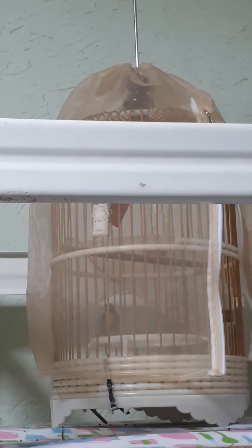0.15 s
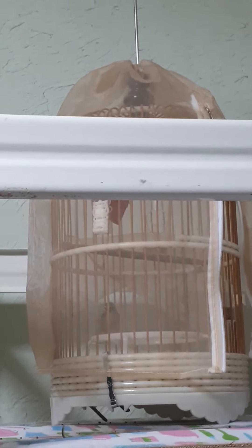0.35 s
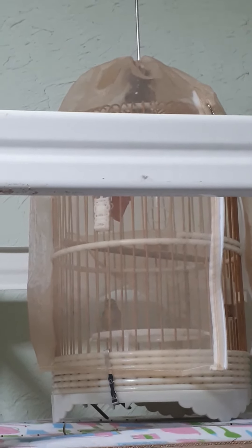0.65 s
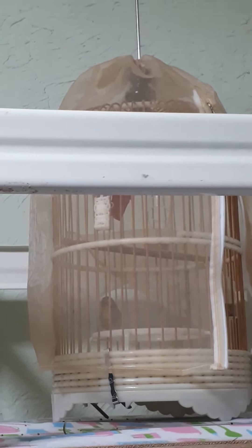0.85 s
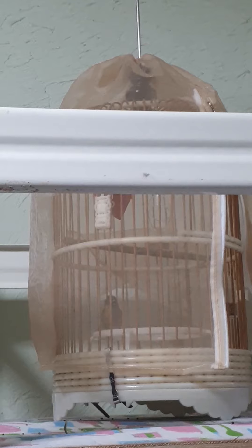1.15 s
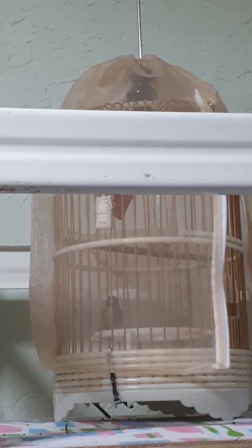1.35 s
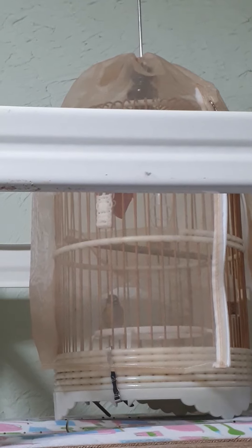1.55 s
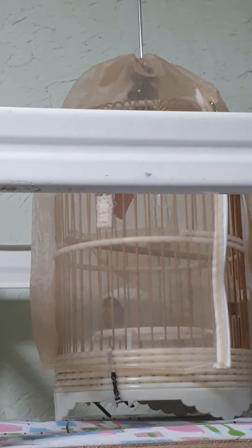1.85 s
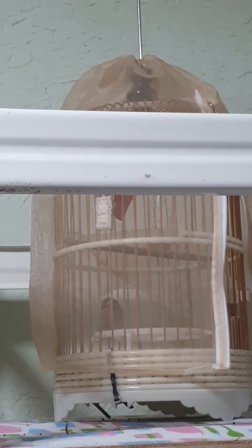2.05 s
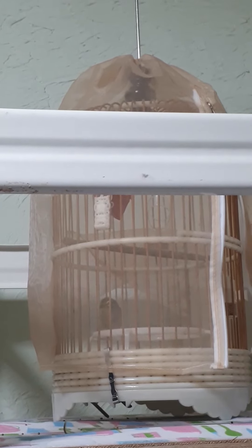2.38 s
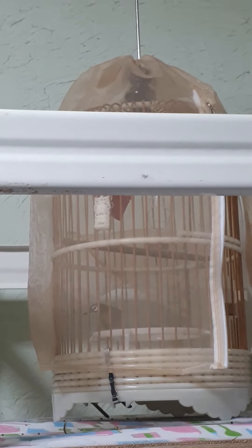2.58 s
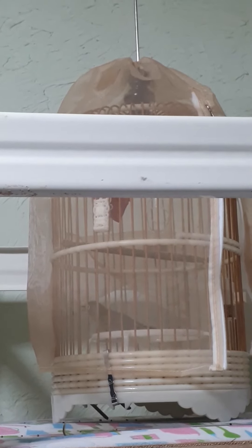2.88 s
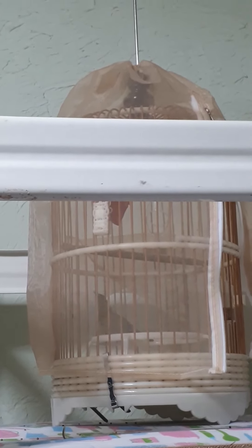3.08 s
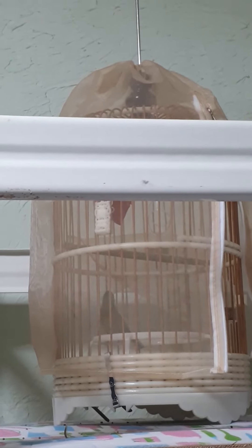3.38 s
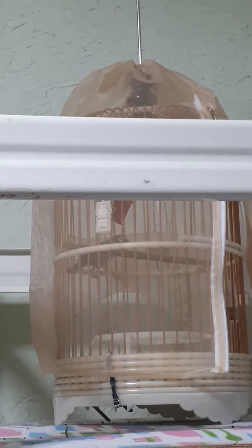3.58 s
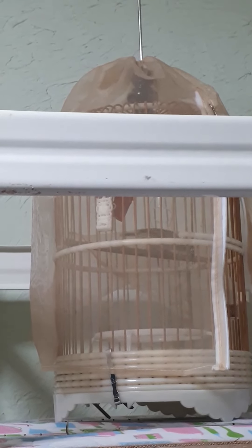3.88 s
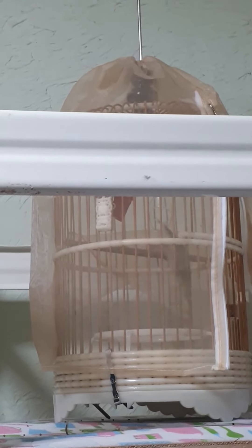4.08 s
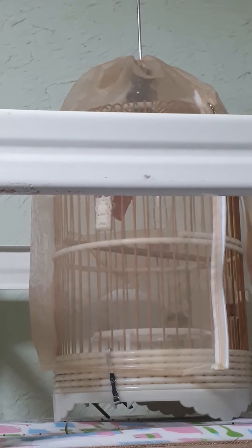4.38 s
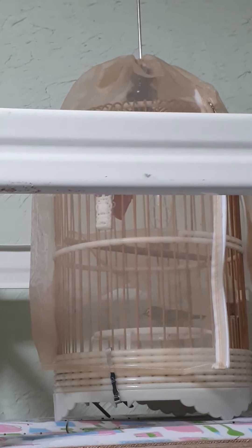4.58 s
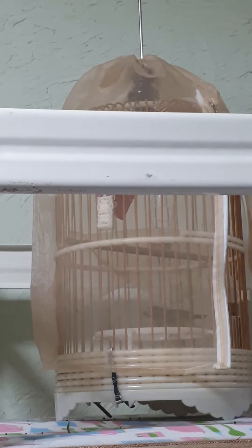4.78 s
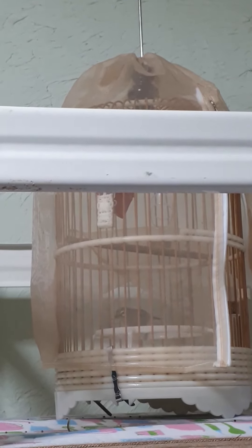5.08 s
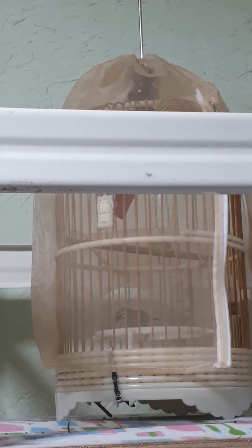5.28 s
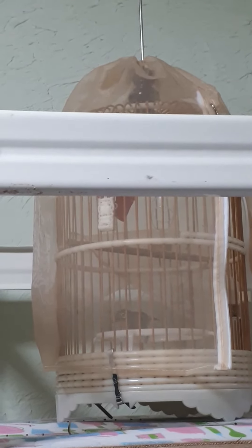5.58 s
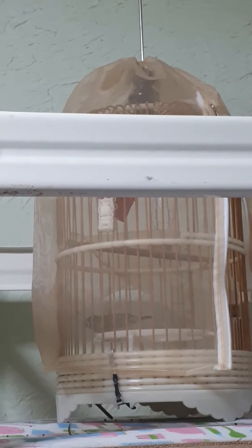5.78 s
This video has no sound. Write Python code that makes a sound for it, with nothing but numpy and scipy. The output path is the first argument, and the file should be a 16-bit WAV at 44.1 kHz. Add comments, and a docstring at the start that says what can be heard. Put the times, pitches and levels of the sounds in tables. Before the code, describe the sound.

A small songbird in a cage, close to the microphone, sings a quick run of high whistled chirps, each sliding down in pitch. It pauses, and a second bird answers more faintly from farther away. The near bird then returns with more falling chirps, some a little husky, while the other slips notes in between. The small room adds a short echo, and a fan hums faintly throughout.

```python
"""A small songbird in a bamboo cage sings quick falling whistles; a second answers from further off.
Thin membranes in each bird's throat swing in its breath. They snap up to pitch, then slide down as
they slacken, and some notes have a husky edge. A small room with hard walls smears the notes,
and a fan hums faintly underneath."""
import sys
import numpy as np
from scipy import signal
from scipy.fft import rfft, irfft
from scipy.io import wavfile
from scipy.ndimage import uniform_filter1d, minimum_filter1d

SR = 44100
rng = np.random.default_rng(int(sys.argv[2]) if len(sys.argv) > 2 else 0)


def put_to_file(sound):
    """Save the sound as 16-bit audio at rate SR, in the file named by the first command-line argument."""
    columns = np.atleast_2d(sound).T  # one column per channel
    safe = np.clip(columns, -1, 1)
    whole_steps = np.round(safe * 32767)
    wavfile.write(sys.argv[1], SR, whole_steps.astype(np.int16))


N = 261954
T = np.arange(N) / SR


def undb(db):
    """Turn decibels into a gain."""
    return 10 ** (np.asarray(db) / 20)


def unit(x):
    """Scale a signal so that its average power is 1."""
    return x / np.sqrt(np.mean(x ** 2))


def colour(x, points):
    """Turn lows and highs up or down along a curve of (pitch_hz, gain_db) points."""
    hz, db = np.transpose(points)
    f = np.maximum(np.fft.rfftfreq(N, 1 / SR), 1)
    return irfft(rfft(x) * undb(np.interp(np.log(f), np.log(hz), db)), N)


def drift(rate_hz):
    """A smooth random wander, about 1 in size."""
    k = max(int(SR / rate_hz), 1)
    steps = np.repeat(rng.standard_normal(N // k + 1), k)
    return unit(uniform_filter1d(uniform_filter1d(steps, k), k)[:N])


def spread(mid, side):
    """Make left and right from a shared part and a side part."""
    return np.array([mid + side, mid - side])


def near_bird():
    """The caged bird whistles close by, each note with a tone of its own."""
    # Its song: start_s, rise_s, length_s, top_hz, end_hz, hold_s, sag (0 straight, 10 a sudden drop),
    # lilt_hz, lilt_at (0-1), level_db, fade_db, husk_db, second_harmonic_db, third_harmonic_db, chip_db
    notes = [ (-.006, 0.0067, .18, 5040, 3420, 0.0051, 3.37, -1, 0.7, -21, -2, -47, -24.5, -17.5, -14),
             (.369, .011, 0.17, 5070, 3772, 0.054, 0.31, 1, .6, -14.5, -5, -46, -34, -23.5, -27.5),
             (.627, 0.0083, 0.09, 4970, 3450, .037, 12.7, -5, .6, -14, -6.5, -53, -31, -22, -29),
             (.784, .011, 0.031, 4750, 4810, 0.018, 4, 4, .6, -14.5, -9, -43, -24, -16.5, -37),
             (.815, .009, .12, 5484, 3987, 0.037, 8.6, 155.5, .74, -14, -7.5, -36, -19, -22.5, -42),
             (1.066, 0.013, 0.13, 4375, 3120, 0.018, 1.46, 158.5, 0.8, -13.5, -9.5, -35, -26.5, -21, -31.5),
             (1.263, .009, 0.15, 5202, 3698, 0.047, 2.86, 379, 0.75, -14.5, -3, -53, -30.5, -22, -30),
             (2.829, 0.013, .11, 4893, 3790, 0.025, 1.15, -3, 0.4, -18, -8, -33.5, -32, -25, -27),
             (3.629, 0.0097, 0.11, 4850, 3606, .011, 11.2, 442, 0.64, -22.5, -8.5, -31, -23, -24, -32),
             (3.887, 0.0058, 0.11, 4312, 3100, 0.0074, 1.36, 1, .6, -30.5, -6, -24, -8, -10, -16.5),
             (4.157, .009, 0.087, 5520, 3115, 0.0019, 0.31, 114, 0.47, -17.5, -14.5, -33, -27.5, -24, -23),
             (4.352, .011, .096, 4673, 3283, .011, 3.2, 253, .66, -19, -5.5, -24.5, -19, -17, -30),
             (4.535, .014, 0.12, 5470, 3667, .012, 2.87, 118, .5, -16, -5.5, -36, -30, -23.5, -24.5),
             (4.747, 0.011, 0.085, 4510, 3340, .012, 5, 254.5, 0.59, -17.5, -3, -25.5, -23.5, -21, -31.5),
             (5.286, .02, 0.13, 4970, 3455, .012, 0.8, 522.5, 0.64, -17, -5.5, -32, -17, -20, -21.5),
             (5.613, .015, 0.13, 4834, 3506, .018, 3.92, 200, 0.66, -13.5, -8.5, -38, -27.5, -24.5, -29.5),
             (5.856, .011, 0.062, 3893, 3140, 0.015, 1.6, 0, .6, -15.5, -15, -32.5, -24, -24, -41.5), ]
    return room(voice_box(notes), direct_db=-4.0, early_db=1, tail_db=-3.5, build_s=0.0073)


def voice_box(notes, soft_start_db=-8, release_s=0.0074, jitter=0.009, wobble=0.0092,
              swell_s=0.0042, scoop=.46, arch=0.0458, overshoot=0.0497, settle_s=0.028,
              shiver_hz=85, buzz_hz=190, loud_db=-14, hiss_db=-43):
    """The membranes snap up to pitch as they start to swing, then glide down as their tension eases."""
    # Moments when a fast buzz shakes the pitch: centre_s, half_length_s, depth_hz
    buzzes = [(0.839, 0.022, 830), (3.94, 0.081, 160), (4.194, 0.034, 377)]
    # Windpipe and beak pass the whistle and hold back its overtones: pitch_hz, gain_db
    throat = [(1500, -30), (2500, 7), (3300, 0.5), (5500, 2), (6800, -3.5), (8500, -8), (10500, -12),
              (13000, -2.5), (15500, 1)]
    song = np.zeros(N)
    waver = 1 + jitter * drift(1100) + wobble * drift(150)
    depth_hz = sum(hz * np.exp(-((T - centre) / half) ** 2) for centre, half, hz in buzzes)
    buzz = depth_hz * np.sin(2 * np.pi * buzz_hz * T + 0.3 * drift(150))
    slip = 0.3 * drift(300)
    rasp = colour(rng.standard_normal(N), [(1800, 5), (3000, -1.5), (7000, 15.0), (12000, -3.0)])
    for start, rise_s, length, *shape, db, fade_db, husk_db, second_db, third_db, chip_db in notes:
        husk, second, third, chip = undb([husk_db, second_db, third_db, chip_db])
        on = (T > start - rise_s) & (T < start + length + 5 * release_s)
        t = T[on]
        age = np.maximum(t - start, 0)
        closed = np.clip((start - t) / rise_s, 0, 1)
        slack = np.exp(-age / swell_s)  # pitch and level take a moment to reach the top
        # the tension overshoots and shivers before it settles
        shiver = overshoot * np.exp(-age / settle_s) * np.cos(2 * np.pi * shiver_hz * age)
        pitch = slide(age, length, *shape) * (1 + shiver - arch * slack) * (1 - scoop * closed ** 2)
        phase = 2 * np.pi * np.cumsum(pitch * waver[on] + buzz[on]) / SR
        swing_db = db + soft_start_db * slack + fade_db * np.minimum(age / length, 1)
        release = np.exp(-np.maximum(age - length, 0) / release_s)
        swing = undb(swing_db) * (1 - closed) ** 3 * release
        effort = np.sqrt(swing / undb(loud_db))  # wider swings sound brighter
        tone = np.sin(phase) + second * np.sin(2 * phase) + effort * third * np.sin(3 * phase)
        # the first swings slap together in a short, raspy chip
        snap = undb(db - loud_db) * np.minimum(3 * (1 - closed), 1)
        snap *= np.exp(-(t - start + rise_s) / 0.008)
        attack = snap * chip * (np.sin(2 * phase) + 0.94 * np.sin(phase) + 0.5 * rasp[on])
        # a husky voice repeats only every fourth swing, adding tones between the harmonics
        quarter = phase / 4 + slip[on]
        husky = np.sin(3 * quarter) + 0.81 * sum(np.sin(k * quarter) for k in range(5, 8))
        husky += 0.31 * sum(np.sin(k * quarter) for k in range(9, 16))
        song[on] += np.sqrt(2) * (swing * (tone + husk * husky + undb(hiss_db) * rasp[on]) + attack)
    return colour(song, throat)


def slide(age, length, top_hz, end_hz, hold_s, sag, lilt_hz=0, lilt_at=0):
    """A note's pitch holds at the top, sinks with a small bump (the lilt), then flicks down."""
    lilt_share, flick_octaves_per_s = .17, 9.06
    hold_s = np.clip(hold_s, 0, .8 * length)
    progress = np.clip((age - hold_s) / (length - hold_s), 0, 1)
    relaxed = np.expm1(-sag * progress) / np.expm1(-sag)
    lilt = lilt_hz * np.exp(-((age / length - lilt_at) / lilt_share) ** 2)
    flick = 2 ** (-flick_octaves_per_s * np.maximum(age - length, 0))
    return (top_hz + (end_hz - top_hz) * relaxed + lilt) * flick


def room(x, direct_db, early_db, tail_db, build_s):
    """Sound arrives directly, then bounces off bars, ledge and wall, then lingers in the room."""
    early = echoes(ring_s=0.18, treble_ring_s=0.078, build_s=0.00086, width=0.5)
    tail = echoes(ring_s=0.42, treble_ring_s=0.33, build_s=build_s, width=0.47)
    response = undb(early_db) * early + undb(tail_db) * tail
    direct = undb(direct_db) * colour(x, [(5500, 0.5), (11000, 2.0)])
    return direct + np.array([signal.fftconvolve(x, ear)[:N] for ear in response])


def echoes(ring_s, treble_ring_s, build_s, width):
    """Crowded echoes build up, then fall by 60 dB over the ring time, the treble sooner."""
    t = T[:SR]
    noise = spread(rng.standard_normal(SR), width * rng.standard_normal(SR))
    low = signal.sosfiltfilt(signal.butter(4, 7000, fs=SR, output="sos"), noise)
    tail = low * np.exp(-np.log(1000) * t / ring_s)
    tail += (noise - low) * np.exp(-np.log(1000) * t / treble_ring_s)
    return unit(tail * (1 - np.exp(-t / build_s))) / np.sqrt(SR)


def fan(hum_db=-1.5, rush_db=-45, hiss_db=-50.5, wander_hz=2.085,
        boom_hz=153, boom_width_hz=14, boom_db=-57):
    """A motor's wavering hum, a thin hiss and a soft rush of air that makes the room boom."""
    # The motor's tones: pitch_hz, level_db (before hum_db is added)
    motor_tones = [(96.9, -56.5), (188.4, -62.5), (301.5, -52), (333.8, -60), (398.4, -60), (549.1, -57),
                   (597.5, -65.5), (748.3, -60.5), (1502, -62)]
    # The low rush of air: pitch_hz, gain_db
    rush_curve = [(15, -53), (25, -14.5), (65, -12), (92, -2), (125, -8), (173, 0), (261, -9), (295, -6),
                  (430, -9), (543, -11), (638, -10.5), (736, -12.5), (1210, -14), (1510, -12.5),
                  (1800, -21.5), (2340, -56), (3960, -120)]
    # The thin hiss: pitch_hz, gain_db
    hiss_curve = [(1060, -35), (1800, -1.5), (2790, -2), (3440, -3.5), (4970, -9), (5390, -13), (8590, -10),
                  (12300, -21.5), (16000, -22)]
    hum = np.zeros(N)
    for hz, db in motor_tones:
        level = np.sqrt(2) * undb(hum_db + db + drift(4.6))
        hum += level * np.sin(2 * np.pi * np.cumsum(hz + wander_hz * drift(16)) / SR)
    rush = undb(rush_db + .5 * drift(4.26)) * air(rush_curve)
    room_note = signal.iirpeak(boom_hz, boom_hz / boom_width_hz, fs=SR)
    boom = undb(boom_db) * unit(signal.lfilter(*room_note, rng.standard_normal(N)))
    return hum + rush + boom + undb(hiss_db) * air(hiss_curve)


def air(curve):
    """Steady noise shaped by a curve; the bass is alike in both ears."""
    mid, side = (unit(colour(rng.standard_normal(N), curve)) for _ in range(2))
    side = colour(side, [(40, -13.0), (130, -27.5), (300, -11.5), (1200, -7.5), (10000, -6.0)])
    return spread(mid, side)


def far_bird():
    """A second bird answers, duller and heard mostly by way of the walls."""
    # Its song: start_s, rise_s, length_s, top_hz, end_hz, hold_s, sag, level_db, fade_db
    notes = [(0.33, 0.011, 0.15, 4760, 3700, 0.012, 6.2, -34.5, -11),
             (1.216, 0.011, 0.11, 4750, 3770, 0.019, 2.2, -36, -2),
             (1.641, 0.0089, 0.082, 4590, 3185, 0.015, 6.5, -38, -20),
             (2.312, 0.006, 0.2, 4880, 3580, 0.0044, 1.44, -25, -14.5),
             (2.618, 0.015, 0.13, 4645, 3634, 0.001, 2.9, -35.5, -13.5),
             (3.138, 0.012, 0.18, 4950, 3190, 0.0009, 5.1, -37.5, -18.5),
             (3.407, 0.013, 0.194, 4640, 2845, 0.021, 4.5, -39, -19.5),
             (4.043, 0.005, 0.22, 5030, 3676, 0.0057, 2.43, -27.5, -5),
             (4.998, 0.014, 0.075, 4970, 3610, 0.0017, 1.35, -34, -5.5),
             (5.225, 0.01, 0.05, 4190, 4000, 0.0044, 1.75, -40, -5)]
    # Its tone in every note: husk_db, second_harmonic_db, third_harmonic_db, chip_db
    tone = (-39, -23, -29, -22)
    song = voice_box([(*note, *tone) for note in notes],
                     soft_start_db=-5, release_s=0.015, jitter=0.0175, wobble=0.0163)
    dulled = colour(song, [(5500, -1.5), (7500, -8), (13000, -5)])
    return room(dulled, direct_db=-7.5, early_db=-1, tail_db=0.0, build_s=0.019)


def scene():
    """Two birds sing over the fan."""
    return near_bird() + far_bird() + fan()


def record(dry, ceiling=.86, top_hz=15850):
    """A limiter eases the loudest swells, and the very highest treble is cut."""
    peak = -minimum_filter1d(-np.abs(dry).max(axis=0), size=400)
    gain = uniform_filter1d((1 + (peak / ceiling) ** 4) ** -.25, size=300)
    return signal.sosfilt(signal.ellip(10, .2, 80, top_hz, fs=SR, output="sos"), dry * gain)


dry = scene()
out = record(dry)
put_to_file(out)
```